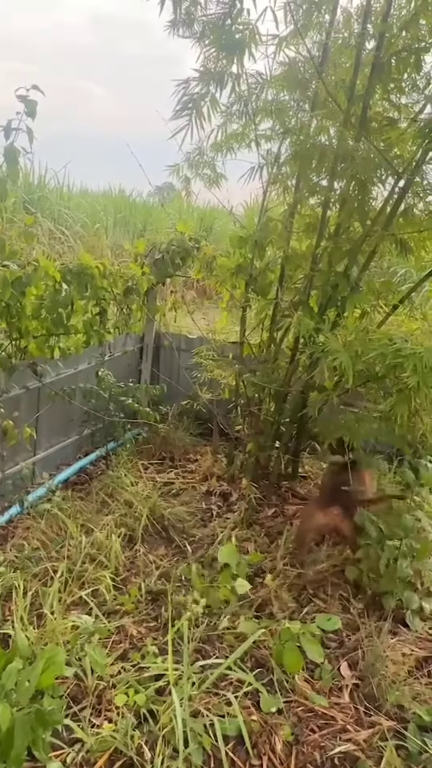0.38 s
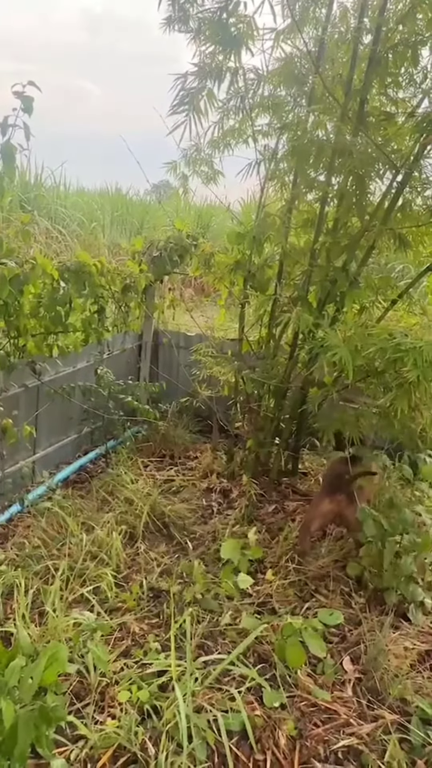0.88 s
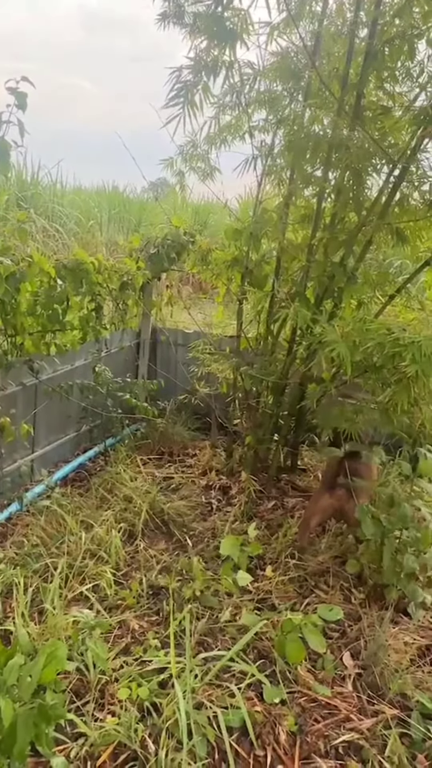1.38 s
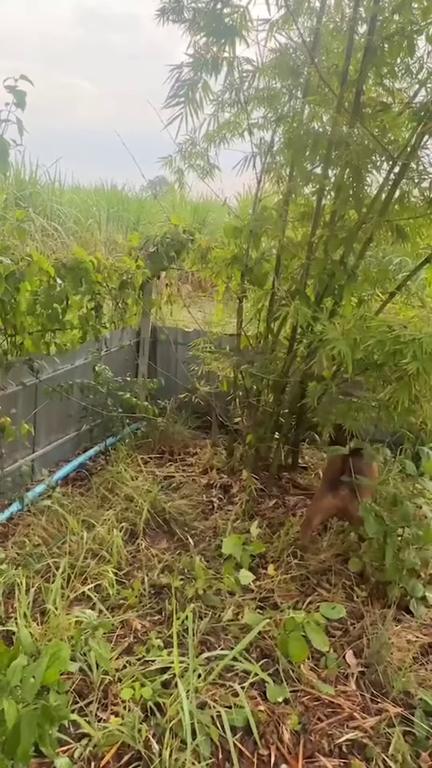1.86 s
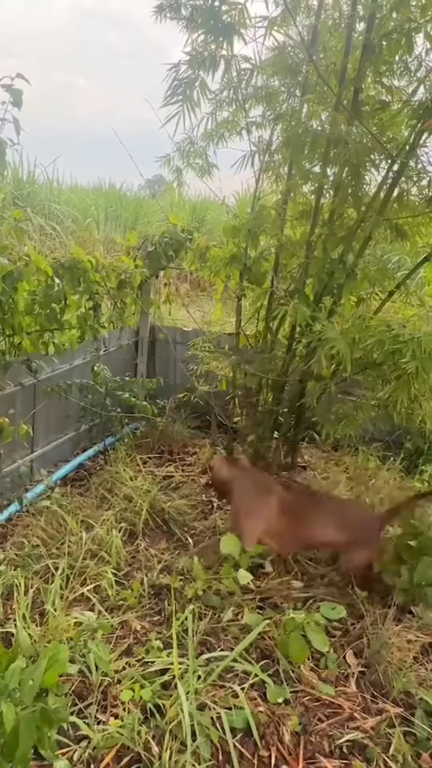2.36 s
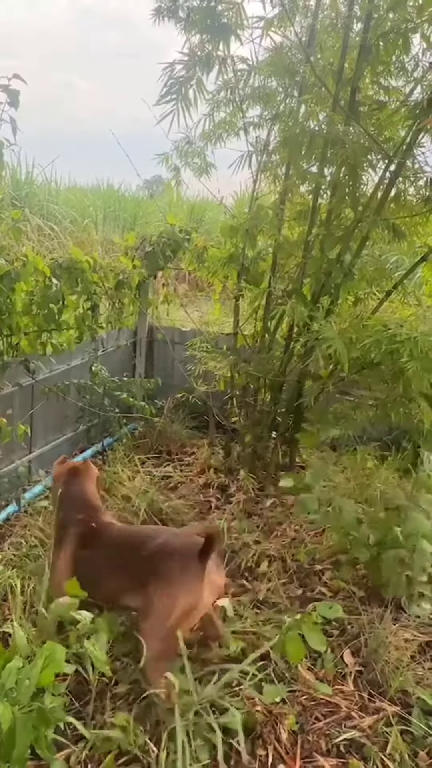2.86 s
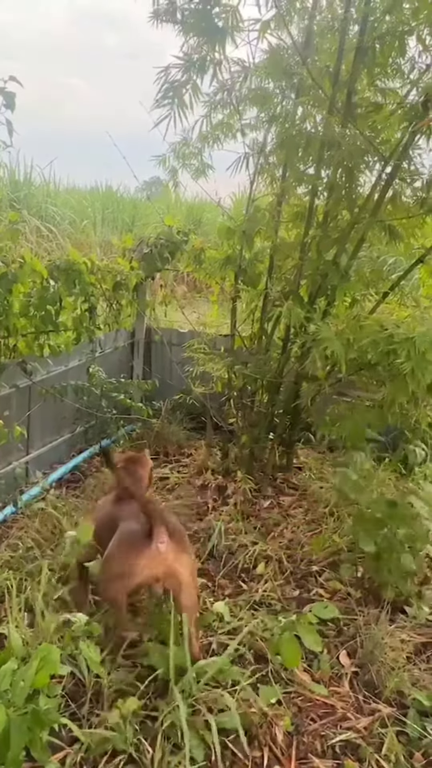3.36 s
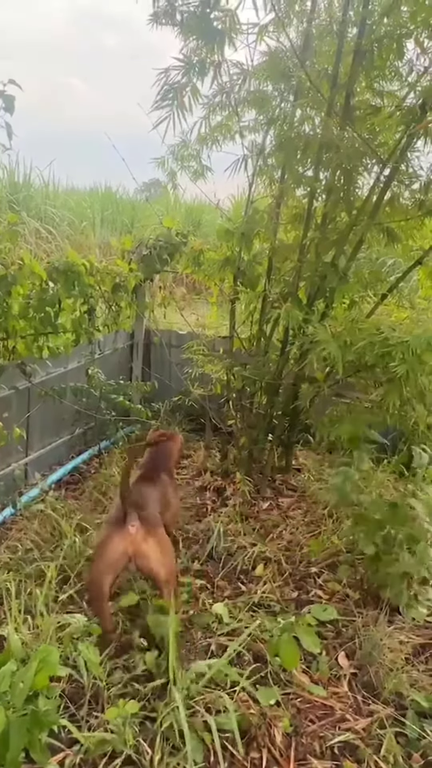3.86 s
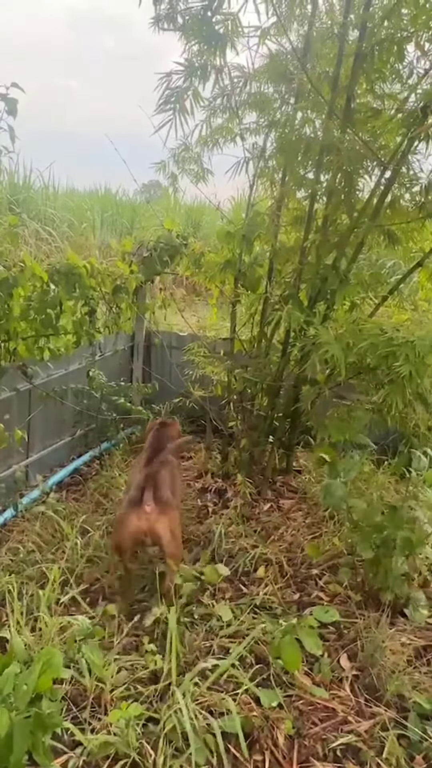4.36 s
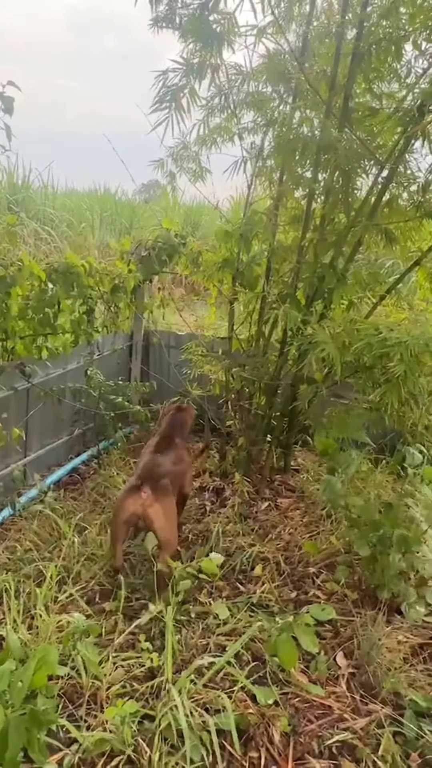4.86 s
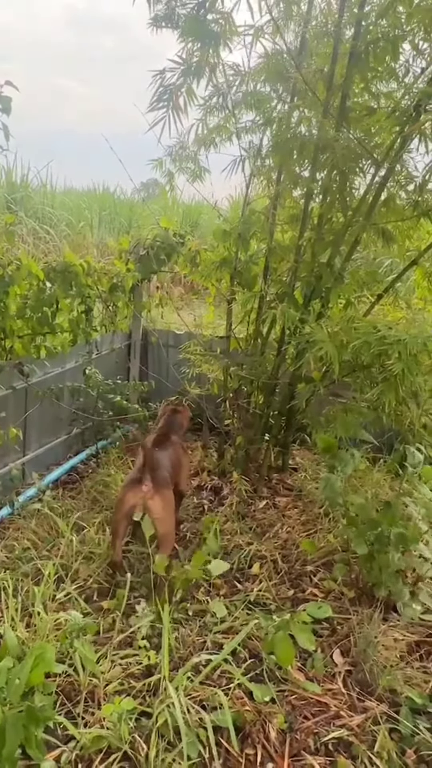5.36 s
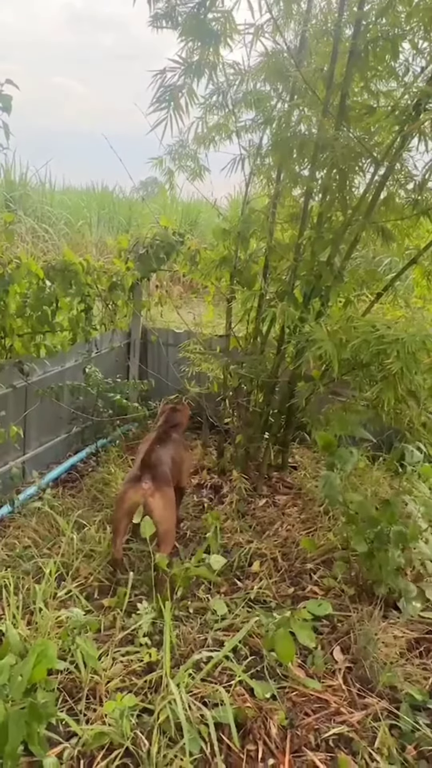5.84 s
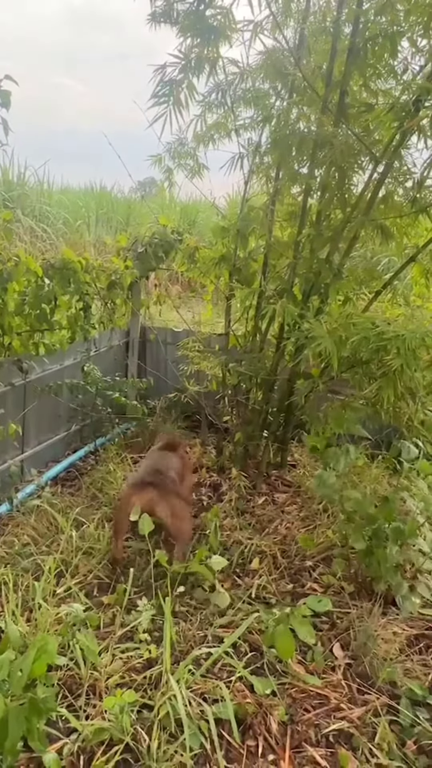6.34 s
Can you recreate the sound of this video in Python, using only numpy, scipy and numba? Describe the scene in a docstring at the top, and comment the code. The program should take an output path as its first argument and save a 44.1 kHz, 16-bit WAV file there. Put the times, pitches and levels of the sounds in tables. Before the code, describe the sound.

A dog a few metres off growls and swells into hoarse single barks again and again, snorting once, in a quiet weedy yard.

```python
"""A dog growls a few metres away in a weedy yard; most growls swell into a hoarse bark, and once it snorts.
Slow uneven throat flaps give way to fast vocal-fold pulses; the flaps ring the chest, and both ring the throat
and mouth. Breath hisses between calls; a fence and stems scatter the sound into short echoes of decaying noise.
A far low hum, wind, a gliding bird and crackling leaf ticks, all filtered noise, lie under it. The stereo
microphone sheds deep bass, pulls bass down after loud bright sound and rounds the peaks."""
import sys
import numpy as np
from scipy import signal
from scipy.fft import rfft, irfft
from scipy.io import wavfile
from scipy.ndimage import uniform_filter1d
from numba import njit

SR = 44100
rng = np.random.default_rng(int(sys.argv[2]) if len(sys.argv) > 2 else 0)


def makeup_ratio(level_db):
    """Linear amplitude ratio for a level in decibels (20 dB per factor of ten)."""
    decades = np.asarray(level_db, float) / 20
    return 10 ** decades


def waveform_to_disk(signal):
    """Save audio, clipped to [-1, 1], as 16-bit WAV at the path in sys.argv[1]."""
    frames = np.transpose(np.atleast_2d(signal))
    scaled = np.clip(frames, -1, 1) * 32767
    samples = np.round(scaled).astype(np.int16)
    wavfile.write(sys.argv[1], SR, samples)


N = 296352

# one table a call: (t/s, throat level/dB, throat f/Hz, chest level/dB re throat,
# mouth f/Hz, nominal mouth level/dB re throat)
CALLS = [
    [(0.0, -21.5, 494.4, -11.5, 1290, -13), (0.026, -19.5, 492.2, -11.5, 1280, -17),
     (0.074, -11, 493, -30, 1340, -10.5), (0.136, -17.5, 513.5, -34, 1330, -5),
     (0.208, -20, 437, -49.5, 1400, -2), (0.236, -33.5, 439.4, -17.5, 1490, -6.5),
     (0.256, -21, 446.2, -14, 1460, -12.5), (0.356, -23, 516.2, -15, 1240, -15.5),
     (0.408, -29, 500.4, -12.5, 1630, -14), (0.462, -26, 515.4, -13, 1300, -17),
     (0.516, -33, 495, -11.5, 1800, -10), (0.565, -45.5, 487, -7.5, 1740, -15)],
    [(0.882, -50, 527, -5.5, 1280, -3.5), (0.924, -38, 596, -0.5, 1260, -6.5),
     (0.992, -31.5, 522, -5.5, 1850, -20), (1.202, -24, 506, -9, 1580, -18),
     (1.278, -9.5, 522, -33.5, 1570, -10), (1.352, -18.5, 550, -30.5, 1367, 2),
     (1.384, -14, 499.3, -39.5, 1371, -9), (1.472, -21.5, 432.8, -30.5, 1207, -16.5),
     (1.538, -27, 468.4, -12, 1600, -32), (1.598, -16, 491.9, -28, 1310, -18.5),
     (1.66, -20, 478, -42.5, 1312, -9.5), (1.7, -16, 470, -60.5, 1300, -8.5),
     (1.744, -33, 449.4, -18.5, 1355, 3.5), (1.794, -25, 428, -18.5, 1320, -18),
     (1.86, -52, 434.6, -7, 1426, -22)],
    [(2.195, -49, 557, -5.5, 1560, -7), (2.231, -42.5, 594, -0.5, 1730, -11),
     (2.357, -40, 484, -1, 1850, -12), (2.599, -38.5, 516, -2.5, 1852, -11),
     (2.747, -28, 524, -12, 1780, -16), (2.767, -34, 507, -4.5, 1816, -12.5),
     (2.865, -15, 521, -19, 1384, -12), (2.909, -19, 523, -36, 1340, -3.5),
     (2.961, -15.5, 484, -38, 1417, 0), (3.015, -20.5, 509, -37.5, 1457, 3.5),
     (3.073, -17.5, 473.3, -42, 1370, -12.5), (3.095, -18.5, 456, -41, 1334, -13),
     (3.163, -26, 448.4, -9.5, 1240, -22), (3.203, -37, 459.5, -11.5, 1832, -17),
     (3.24, -44, 481.3, -33.5, 1582, -32)],
    [(3.525, -50.5, 559, -1.5, 1350, 0.5), (3.619, -37, 541, -3, 1764, -10.5),
     (3.745, -25, 528, -7, 1720, -14.5), (3.763, -30.5, 521, -6, 1540, -10),
     (3.793, -22, 481, -14, 1501, -17.5), (3.847, -29.5, 481, -10.5, 1578, -16.5),
     (3.897, -20.5, 476, -18.5, 1514, -16.5), (3.971, -17.5, 447, -12.5, 1189, -23.5),
     (4.041, -23.5, 459, -16.5, 1180, -17), (4.075, -23.5, 480, -12, 1209, -26),
     (4.125, -29, 484, -9.5, 1650, -16.5), (4.233, -26, 513, -13.5, 1720, -18.5),
     (4.315, -31, 487, -9, 1730, -14), (4.355, -59, 480, -1, 1810, -3)],
    [(4.66, -52, 536, 2.5, 1610, -7), (4.728, -37.5, 549, -0.5, 1870, -6),
     (4.816, -30.5, 549, -5, 1790, -14), (4.912, -31.5, 510, -7.5, 1774, -12),
     (4.936, -24.5, 513, -15, 1798, -22.5), (5.012, -30, 482.2, -6.5, 1790, -9.5),
     (5.096, -24, 507, -8, 1735, -15), (5.168, -9.5, 533.3, -27.5, 1548, -8.5),
     (5.202, -17, 557.4, -33, 1513, -0.5), (5.242, -11.5, 554, -55, 1452, -8),
     (5.282, -27, 483.8, -18, 1450, -1), (5.332, -20, 434.5, -28, 1215, -10),
     (5.388, -31, 447, -12, 1210, -27), (5.43, -53.5, 457, -14.5, 1609, -18)],
    [(6.517, -58, 560, -13, 1640, 8), (6.543, -43.5, 543, 1, 1623, 1.5),
     (6.599, -34.5, 563, 1.5, 1780, -5.5), (6.685, -27.5, 530, -8.5, 1530, -15),
     (6.72, -26, 535, -9, 1570, -10)],
]
# blast through the nostrils: (t/s, level/dB, thump level/dB re level, hiss level/dB re level)
SNORT_COURSE = [(5.71, -72, 19, 6), (5.738, -40, -0.5, -10.5), (5.798, -51, 19.5, 0),
                (5.83, -33.5, -3, -9.5), (5.912, -33.5, -1, -15.5), (5.952, -42.5, -4, -15),
                (5.99, -70.5, 9, -11)]
# resonances of the nostrils: (f/Hz, width/Hz, level/dB)
NOSTRIL_MODES = [(1317, 41.7, -5.5), (1570, 83, -5), (1930, 20, -13), (2110, 63, -13), (2480, 120, -3.5),
                 (3290, 96, -13.5)]
# indrawn breaths: (start t/s, length/s, starting level/dB, upper resonances at their brightest/dB re level)
BREATHS = [(.56, 0.32, -54, -5), (1.846, 0.3, -50, -8.5), (3.243, 0.28, -50.5, -9),
           (4.347, 0.27, -56, -5.5), (5.432, 0.3, -45, -5), (5.978, .46, -66, -4)]
# airway of the breaths, two low resonances and then the upper ones: (f/Hz, width/Hz, level/dB)
AIRWAY_MODES = [(480, 168, 15), (860, 34, -1.5), (1350, 33, -10.5), (1710, 1370, -3.5), (2310, 38, -8),
                (4900, 4200, -21)]
# upper resonances of the muzzle: (f/Hz, width/Hz, level/dB)
MUZZLE_MODES = [(3690, 220, -1.5), (4066, 85, -4.5), (4415, 310, -1.5), (4840, 210, 0), (5250, 200, -0.5),
                (5750, 200, -1.5), (6300, 250, -1), (6730, 380, -5), (7270, 1100, -5)]
# side resonances of the jaw: (f/Hz, width/Hz, level/dB)
JAW_MODES = [(416, 45, -8.5), (714, 260, -13.5)]
# resonances of the cheeks, before the mouth shape weighs them: (f/Hz, width/Hz, level/dB)
CHEEK_MODES = [(1110, 60, -2), (1310, 60, 0), (1460, 50, 0), (1650, 60, -1), (1820, 70, 0), (2000, 70, -8)]
# resonances of the nose: (f/Hz, width/Hz, level/dB)
NOSE_MODES = [(2221, 110, -4.5), (2456, 37, -8.5), (2870, 200, -12.5)]
# hiss at the teeth: (f/Hz, width/Hz, level/dB)
TEETH_MODES = [(8510, 2700, -69.5), (9900, 1300, -57.5), (14600, 1600, -65)]
# bird whistles: (start t/s, end t/s, from f/Hz, to f/Hz, level/dB)
BIRD_CALLS = [(4.47, 4.62, 5000, 5100, -69), (5.58, 5.69, 4800, 7000, -76), (6.28, 6.45, 3800, 5600, -66),
              (6.39, 6.47, 5800, 6500, -74)]
# dry leaves and stems: (t/s, nominal level/dB, decay time/s)
LEAF_TICKS = [(0.7634, -57.5, 0.035), (2.0303, -46, 0.015), (3.6653, -34, 0.012), (5.5011, -54, 0.016)]
# spectrum of the outdoor floor: (f/Hz, relative level/dB)
YARD_SPECTRUM = [(41, -25), (70, -5.5), (244, -18), (590, -37), (1590, -40.5), (1730, -39.5), (3370, -51),
                 (5070, -40.5), (8880, -45.5), (12000, -68.5), (15600, -97.5), (22000, -120)]
# echoes that differ between the ears: (f/Hz, level/dB re the middle)
SIDE_SPECTRUM = [(60, -21), (110, -33), (200, -2.5), (380, -1.5), (700, -0.5), (1290, -4.5), (2380, -14),
                 (4400, -0.5), (8120, 0.5), (15000, -17)]

FLAP_HZ, THROAT_WIDTH_HZ, MOUTH_WIDTH_HZ = 170, 90, 75
CHEST_HZ, CHEST_WIDTH_HZ = 182, 100
SECOND_HZ, SECOND_WIDTH_HZ = 850, 90
RUMBLE_HZ, RUMBLE_DB = 85, -11  # the ribs shake under a growl; re chest note
# bands that open with the mouth, given for a mouth of -10.5 dB:
# (growl level/dB re throat, bark level/dB re throat, dB per dB of mouth)
SECOND_OPENS, NOSE_OPENS, RASP_OPENS = (-12.5, -9.5, 0.89), (-19, -27, 0.62), (-24.5, -24.5, 0.91)
BREATH_FADE_DB, BREATH_DULL_DB = -18, -17.5  # by its end; while the air is slow
FAST_FROM, FAST_TO, EASES_BY = 0.18, 0.47, 0.62  # shares of a breath's length
ECHO_DB, ECHO_T60_S = -22, 0.2
FLOOR_DB = -57  # rms of the part common to both ears
HUM_HZ, HUM_DB, WIND_DB = 65.5, -47.5, -66.5  # centre levels, before wavering and the lean to the right
# bass cut: bright level that sets it off, dB of cut per dB above that, recovery, top of the bass
DUCK_FROM_DB, DUCK_SLOPE, RECOVER_DB_PER_S, BASS_HZ = -32.5, 1.07, 30, 120


def dog():
    """Growl and bark share one airway; the folds take over as the chest note fades."""
    gain, throat_hz, chest_db, mouth_hz, mouth_db = curve(CALLS)
    voiced = np.clip((-chest_db - 10) / 12, 0, 1)  # 0 growl, 1 bark
    second_db, nose_db, rasp_db = (
        growl_db + voiced * (bark_db - growl_db) + slope * (mouth_db + 10.5)
        for growl_db, bark_db, slope in (SECOND_OPENS, NOSE_OPENS, RASP_OPENS))
    growl, growl_air = folds(FLAP_HZ * np.exp(0.12 * walk(10)), jitter=0.14, shimmer_db=2.5, hiss=0.8)
    bark, bark_air = folds(throat_hz * (1 + 0.02 * walk(50)), jitter=0.05, shimmer_db=3, hiss=0.6)
    bark = bark * makeup_ratio(2.2 * walk(130))  # the folds beat unevenly
    growl_share, bark_share = np.sqrt(1 - voiced), np.sqrt(voiced)
    air = growl_share * growl_air + bark_share * bark_air
    # at full effort the folds tear into noise
    torn = np.clip(gain * makeup_ratio(mouth_db + 21), 0, 1.2)
    source = growl_share * growl + bark_share * bark + torn * air
    # a clear voice carries its second and third partials along as it glides
    clear = voiced * np.clip(1.3 - torn * 1.5, 0, 1)
    second_hz = SECOND_HZ + clear * (2 * throat_hz - SECOND_HZ)
    throat = [(throat_hz, THROAT_WIDTH_HZ, -1), (second_hz, SECOND_WIDTH_HZ, second_db)]
    voice = modes(source, throat, flicker_db=0.8)
    voice += clear * modes(bark, [(3 * throat_hz, 80.0, mouth_db - 5)])
    chest = [(CHEST_HZ, CHEST_WIDTH_HZ, chest_db), (RUMBLE_HZ, 40.0, chest_db + RUMBLE_DB)]
    voice += modes(growl, chest, flicker_db=2)
    voice += (1 - 0.32 * voiced) * modes(air, JAW_MODES)
    # the shape of the mouth favours the resonances near its own
    mouth = [(hz, width, db - np.minimum(((hz - mouth_hz) / MOUTH_WIDTH_HZ) ** 2, 17 - 10 * voiced))
             for hz, width, db in CHEEK_MODES]
    voice += makeup_ratio(mouth_db - 6.9 * clear) * even(modes(source, mouth), 0.028)
    voice += makeup_ratio(nose_db) * modes(source, NOSE_MODES)
    voice += makeup_ratio(rasp_db) * even(modes(air, MUZZLE_MODES))
    # the hiss at the teeth grows far less with effort than the voice does
    return gain * voice + gain ** 0.41 * modes(air, TEETH_MODES, flicker_db=0.5)


def folds(hz, jitter, shimmer_db, hiss):
    """Pulses plus the puff of air behind each; returns the sound and its airy part."""
    chance = rng.standard_normal((N // 30, 2)).T
    pulses, gate = flap(hz, np.exp(jitter * chance[0]), makeup_ratio(shimmer_db * chance[1]))
    air = even((gate + 0.5) * rng.standard_normal(N))
    return even(even(pulses) + hiss * air, 0.085), air


@njit
def flap(hz, stretch, size):
    """A pulse at each wrap of the phase; every cycle has its own length and size."""
    pulses, gate = np.zeros(len(hz) + 1), np.empty(len(hz))
    phase, cycle = 0.0, 0
    for i in range(len(hz)):
        step = hz[i] * stretch[cycle] / SR
        phase += step
        if phase >= 1:
            phase, cycle = phase - 1, cycle + 1
            # split over two samples to keep the exact moment
            pulses[i] += size[cycle] * phase / step
            pulses[i + 1] += size[cycle] * (1 - phase / step)
        gate[i] = size[cycle] * (1 - phase) ** 2
    return pulses[:-1], gate


def snort():
    """A blast of air rings the nostrils, with a low thump and a high hiss that come and go."""
    gain, thump_db, hiss_db = curve([SNORT_COURSE])
    air, _ = folds(np.full(N, 110.0), jitter=0.3, shimmer_db=2, hiss=9.0)
    thump = modes(air, [(76, 25, 0.5), (158.6, 140, -3.0), (550, 770, 0.22)])
    hiss = modes(air, [(5240, 2000, 11), (9300, 3000, -9.5)])
    nostrils = modes(air, NOSTRIL_MODES, flicker_db=-2.0)
    return gain * (even(nostrils) + makeup_ratio(thump_db) * even(thump) + makeup_ratio(hiss_db) * even(hiss))


def breaths():
    """Air hisses through an airway, fluttering a little; it fades, and is bright while it is fast."""
    shares = np.array([0, FAST_FROM, FAST_TO, EASES_BY, 1])
    dull_db = BREATH_DULL_DB * np.array([1, 0, 0, 1, 1])
    courses = [np.transpose([start + length * shares, db + BREATH_FADE_DB * shares ** 1.88, bright_db + dull_db])
               for start, length, db, bright_db in BREATHS]
    gain, bright_db = curve(courses)
    air = rng.standard_normal(N) * makeup_ratio(3.1 * walk(38))
    low, upper = modes(air, AIRWAY_MODES[:2]), modes(air, AIRWAY_MODES[2:])
    return gain * (even(low) + makeup_ratio(bright_db) * even(upper))


def leaves():
    """Each tick is a short burst of bright crackle, sudden and then dying away."""
    t = np.arange(N) / SR
    crackle = even(ring(rng.standard_normal(N) * makeup_ratio(1.4 * walk(620)), 6400.0, 6300.0))
    bursts = sum(makeup_ratio(db - 7.5) * (t > start) * np.exp(-np.abs(t - start) / max(decay, 0.002))
                 for start, db, decay in LEAF_TICKS)
    return crackle * bursts


def bird():
    """Thin blurred whistles: narrow bands of noise that glide upward."""
    t, out = np.arange(N) / SR, 0
    for start, end, from_hz, to_hz, db in BIRD_CALLS:
        share = np.clip((t - start) / (end - start), 0, 1)
        hz = from_hz + (to_hz - from_hz) * share ** 0.83
        whistle = even(ring(rng.standard_normal(N), hz, 330.0))
        out = out + makeup_ratio(db) * np.sin(np.pi * share) ** 0.5 * whistle
    return out


def scatter(x, t60, size):
    """Dense short echoes from fence and stems, as exponentially decaying noise."""
    tail = rng.standard_normal(size) * np.exp(-np.log(1000) * np.arange(size) / SR / t60)
    return signal.fftconvolve(x, tail / np.sqrt(np.sum(tail ** 2)))[:N]


def yard():
    """Outdoor floor that flickers, a wavering low hum and wind rumble, both stronger on the right."""
    mid, side = (colour(rng.standard_normal(N), YARD_SPECTRUM) * makeup_ratio(0.5 * walk(2.7)) for _ in range(2))
    floor = np.array([mid + 0.15 * side, mid - 1.6 * side]) * makeup_ratio(FLOOR_DB) / mid.std()
    hum_gain = makeup_ratio(HUM_DB + 2.5 * walk(5.5))
    hum = hum_gain * even(ring(rng.standard_normal(N), HUM_HZ, 18.0), 0.62)
    wind_gain = makeup_ratio(WIND_DB + 3 * walk(4))
    wind = wind_gain * even(ring(rng.standard_normal(N), 41.0, 27.0), 0.4)
    return floor + (hum + wind) * makeup_ratio([[-2.2], [2.2]])


def modes(x, table, flicker_db=5.0):
    """A set of resonances, neighbours in opposite phase, each wavering in level at random."""
    return sum((-1) ** k * makeup_ratio(db + flicker_db * walk(25)) * even(ring(x, hz, width), 0.056)
               for k, (hz, width, db) in enumerate(table))


def ring(x, hz, width):
    """A resonance applied twice, for dark valleys; each pass is wider, as two in a row narrow the peak."""
    hz = hz + np.zeros(N)
    return svf(svf(x, hz, 1.455 * width), hz, 1.455 * width)


@njit
def svf(x, hz, width):
    """State-variable band-pass whose centre may move."""
    y, band, low = np.empty(len(x)), 0.0, 0.0
    for i in range(len(x)):
        g, k = np.tan(np.pi * hz[i] / SR), width / hz[i]
        v = (band + g * (x[i] - low)) / (1 + g * (g + k))
        band, low, y[i] = 2 * v - band, low + 2 * g * v, k * v
    return y


def even(x, span=0.073):
    """Running rms over span seconds brought to 1."""
    return x / np.sqrt(uniform_filter1d(x ** 2, int(span * SR)) + 1e-12)


def walk(rate):
    """Random levels held 1 / rate s and slewed twice; spread near 1."""
    hold = int(SR / rate)
    steps = np.repeat(rng.standard_normal(N // hold + 1), hold)
    return 1.3 * uniform_filter1d(uniform_filter1d(steps, hold), hold)[:N]


def colour(x, points):
    """Shape a spectrum by (f/Hz, level/dB) points, joined along log frequency."""
    hz, db = np.transpose(points)
    f = np.arange(N // 2 + 1) * SR / N + 1
    return irfft(rfft(x) * makeup_ratio(np.interp(np.log(f), np.log(hz), db)), N)


def curve(tables):
    """Columns of some tables on the sample grid; the first becomes a gain, silent outside them."""
    t = np.arange(N) / SR
    times, *columns = np.transpose(np.vstack(tables))
    columns = [np.interp(t, times, column) for column in columns]
    inside = sum((t >= table[0][0]) & (t <= table[-1][0]) for table in tables)
    gain = makeup_ratio(columns[0]) * uniform_filter1d(1.0 * (inside > 0), size=150)
    return [gain] + columns[1:]


def scene():
    """Near sounds in the middle; their first echoes differ at the two ears and shift; a faint longer tail."""
    near = dog() + snort() + breaths() + leaves() + bird()
    side = colour(scatter(near * np.tanh(walk(36)), 0.17, size=3000), SIDE_SPECTRUM)
    tail = [scatter(near, ECHO_T60_S, size=16000) for _ in range(2)]
    return near + side * [[1], [-1]] + makeup_ratio(ECHO_DB) * np.array(tail) + yard()


def top_cut(x):
    """Nothing passes above the cut-off."""
    return signal.sosfilt(signal.butter(12, 16130, fs=SR, output="sos"), x)


def record(dry):
    """The microphone drops the deepest bass, cuts bass after loud bright sound and rounds the loudest peaks."""
    dry = signal.sosfilt(signal.butter(2, 45.0, "high", fs=SR, output="sos"), dry)
    bright = ring(dry.mean(axis=0), 1500.0, 1000.0)
    bright_db = 10 * np.log10(uniform_filter1d(bright ** 2, size=2000, origin=999) + 1e-12)
    # the cut sets in at once and recovers at a steady rate
    recovery = RECOVER_DB_PER_S * np.arange(N) / SR
    wanted_cut_db = DUCK_SLOPE * np.maximum(bright_db - DUCK_FROM_DB, 0)
    cut_db = np.maximum.accumulate(wanted_cut_db + recovery) - recovery
    bass = signal.sosfiltfilt(signal.butter(3, BASS_HZ, fs=SR, output="sos"), dry)
    mix = dry - (1 - makeup_ratio(-cut_db)) * bass
    mix = mix / (1 + mix ** 4) ** 0.25  # rounds the peaks
    return top_cut(mix)


dry = scene()
out = record(dry)
waveform_to_disk(out)
```